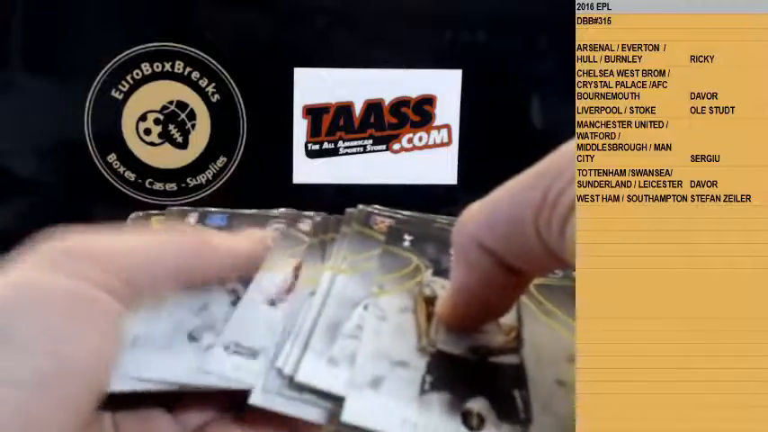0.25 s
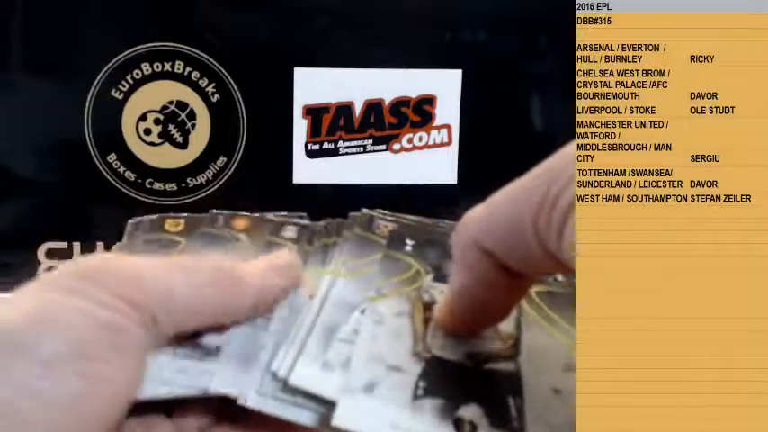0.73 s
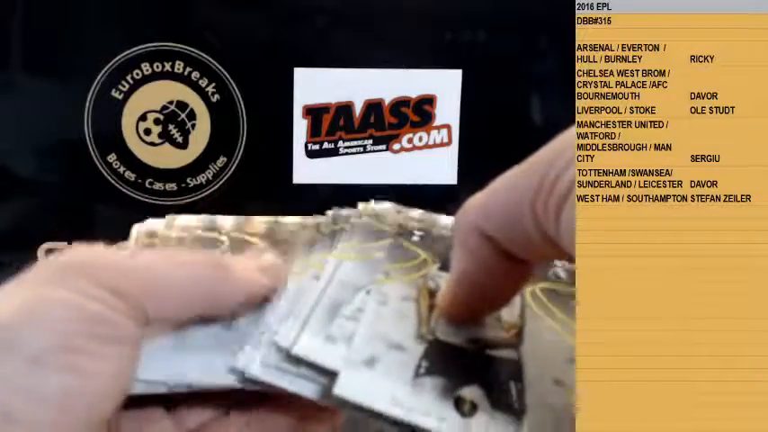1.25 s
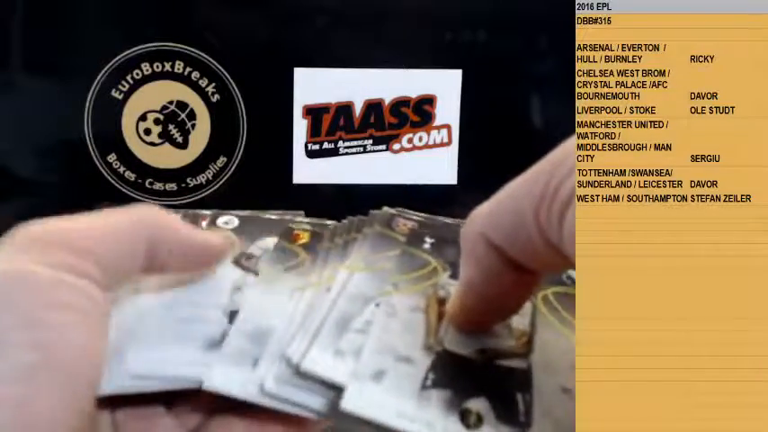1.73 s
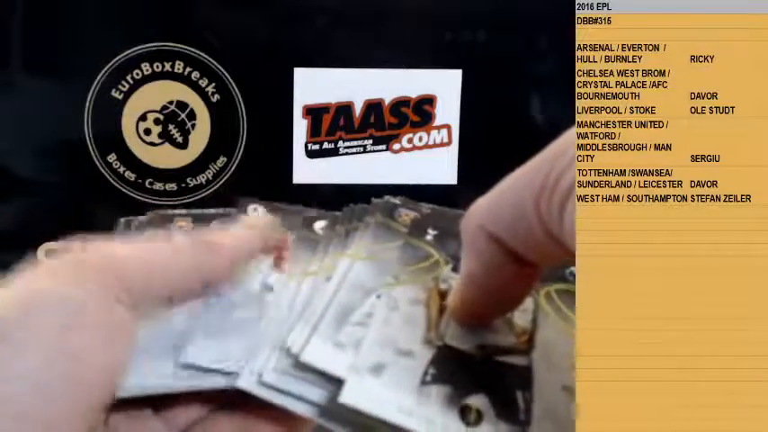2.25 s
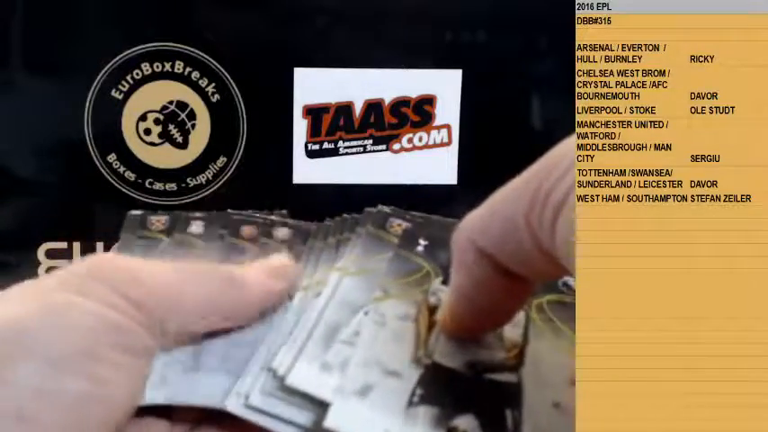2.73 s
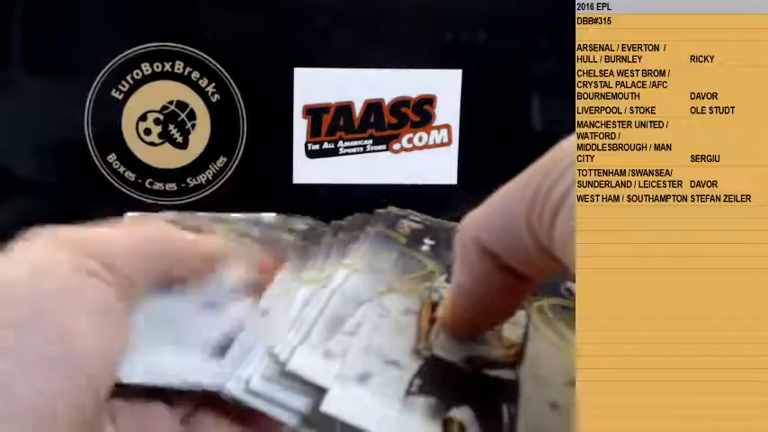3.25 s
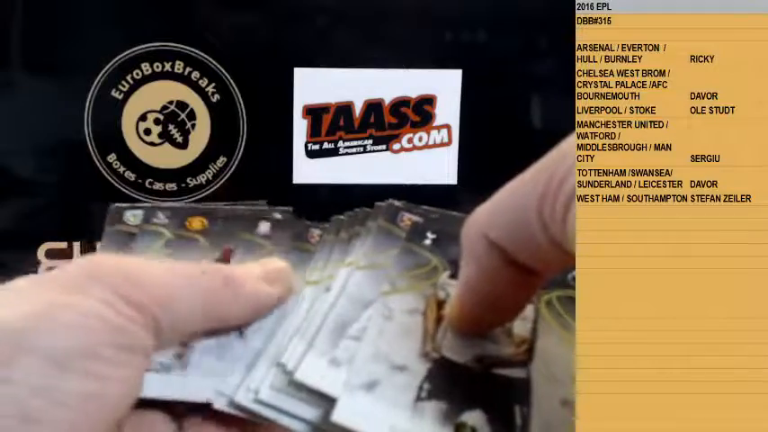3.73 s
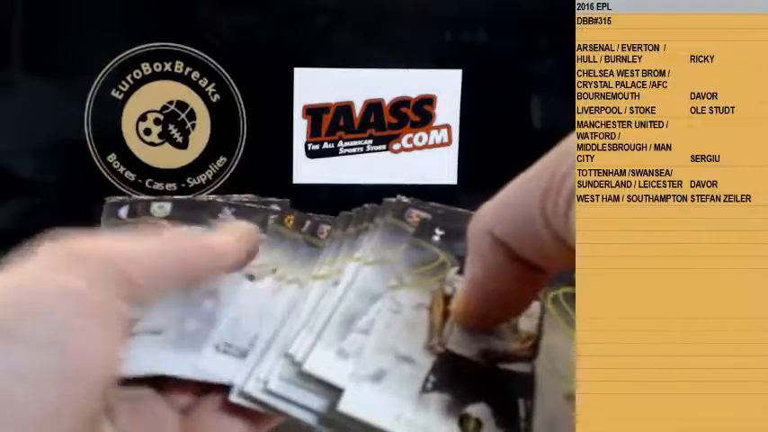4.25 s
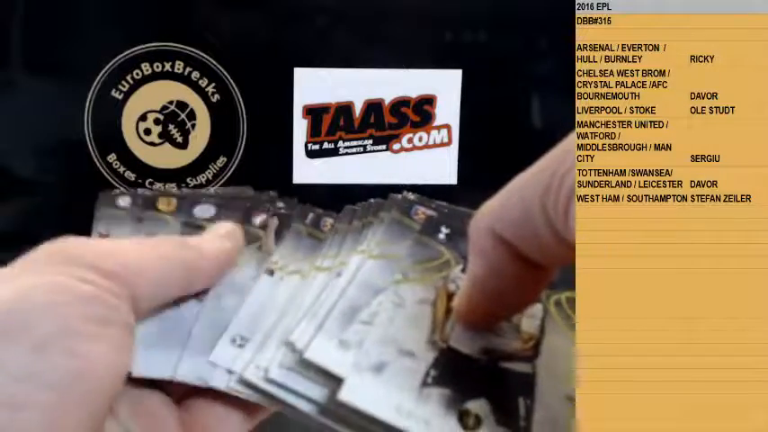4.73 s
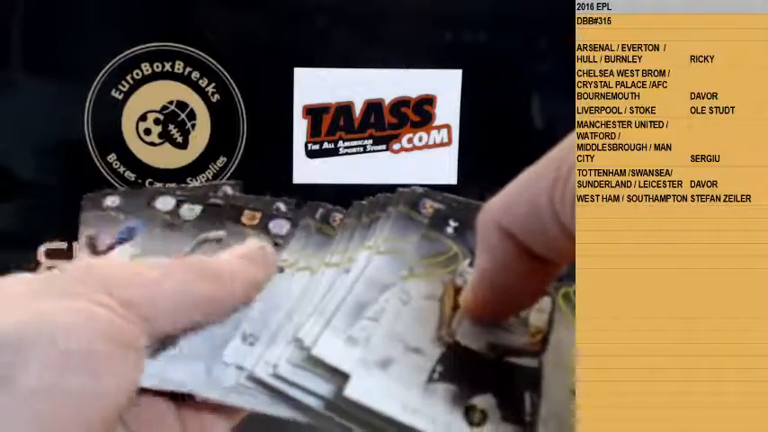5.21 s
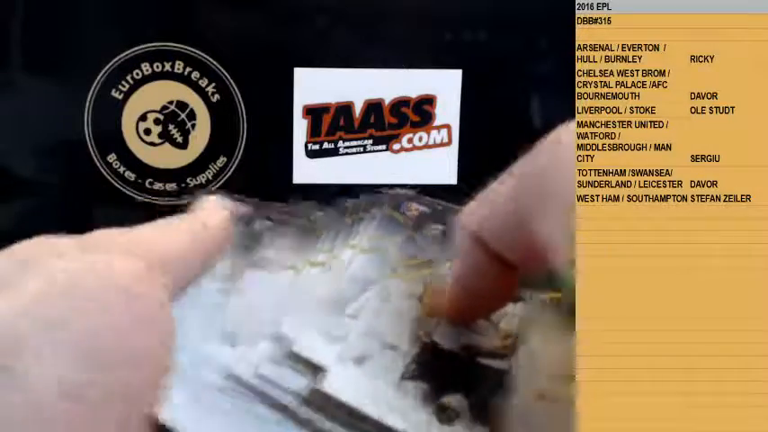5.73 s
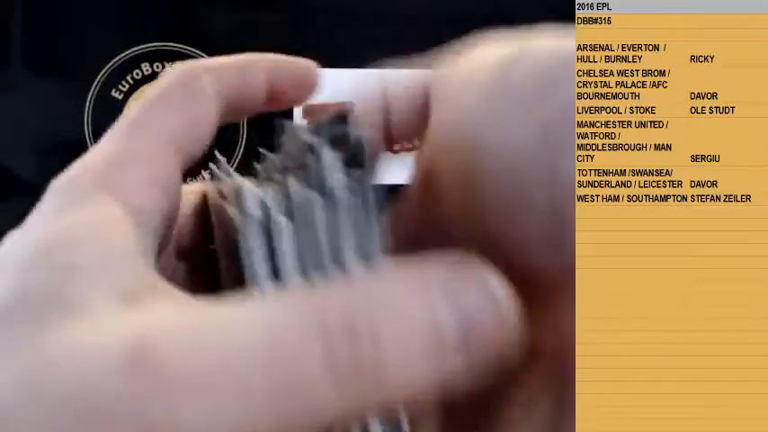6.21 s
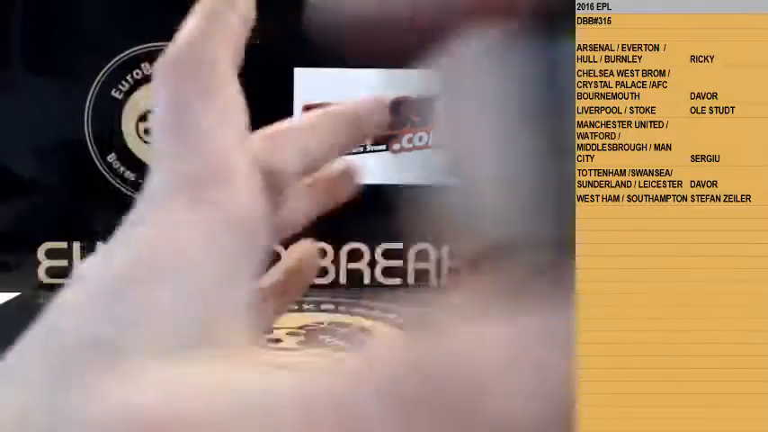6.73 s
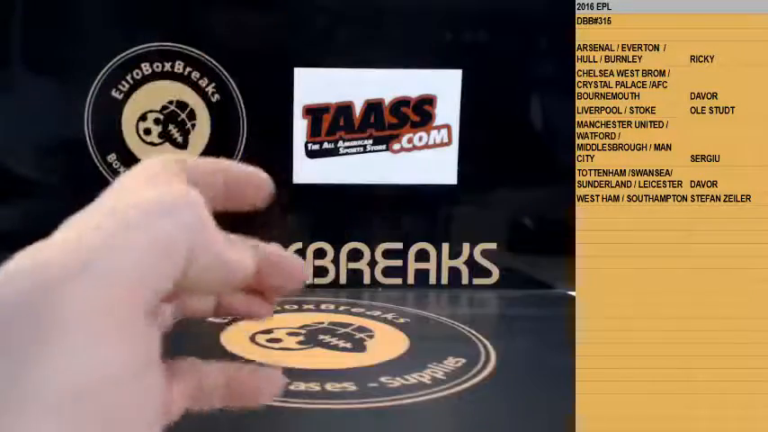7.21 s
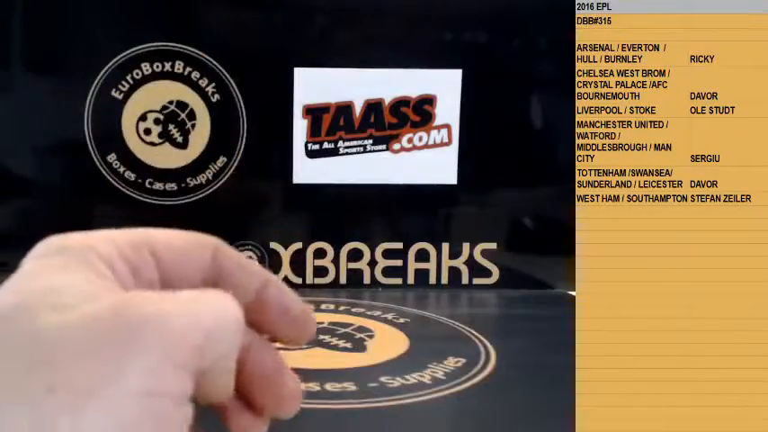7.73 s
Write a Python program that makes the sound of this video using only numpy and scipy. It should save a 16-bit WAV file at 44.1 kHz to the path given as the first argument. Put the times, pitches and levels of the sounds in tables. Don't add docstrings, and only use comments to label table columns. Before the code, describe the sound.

Near stereo microphone, dry small indoor space with faint fan hum and hiss. Thin card edges click and rub irregularly, several times a second, with occasional flat little slaps and dull low bumps from hands. The handling grows busier, a heavy knock of the whole stack stands far above everything, then a muted thud and brisk card scuffs close it.

```python
import sys
import numpy as np
from scipy import signal
from scipy.io import wavfile
from scipy.ndimage import uniform_filter1d

SR = 44100
rng = np.random.default_rng(int(sys.argv[2]) if len(sys.argv) > 2 else 0)


def nominal_scale(level):
    x = np.asarray(level, float) / 20
    return 10 ** x


def to_wav(sig):
    pcm = np.clip(np.atleast_2d(sig), -1, 1) * 32767
    pcm = np.round(pcm).astype(np.int16)
    wavfile.write(sys.argv[1], SR, pcm.T)


N = 351036

# (time [s], blow [dB], contact [s], bass [dB], slap [dB])
STACK_KNOCKS = [
    (7.0906, -2, 0.00034, 6.5, 3),
    (7.0942, -7.5, 0.00027, -8, -30),
    (7.101, -38.5, .0003, -15, 7),
    (7.357, -22, 0.00039, 5, -5),
]


def evened(x):
    return x / np.sqrt(np.mean(x ** 2) + 1e-20)


def wander(size):
    return evened(uniform_filter1d(rng.standard_normal(N), size=size))


def read(points, hz):
    f, value = np.transpose(points)
    return np.interp(np.log(hz + 1), np.log(f + 1), value)


def add(mix, s, sound):
    part = mix[..., max(round(s * SR), 0):][..., :sound.shape[-1]]
    part += sound[..., :part.shape[-1]]


def ring(hz, t60, rise):
    t = np.arange(round(min(t60, 0.5) * SR) + 64) / SR
    x = (1 - np.exp(-t / rise)) * nominal_scale(-60 * t / t60) * np.sin(2 * np.pi * hz * t)
    return x / abs(x).max()


def band(x, lo_hz, hi_hz):
    sos = signal.butter(2, [lo_hz, hi_hz], "bandpass", fs=SR, output="sos")
    return evened(signal.sosfilt(sos, x))


def ports(a, b, colour_db, alike, lead, size):
    # (frequency [Hz], left over right [dB])
    port_tilt = [(60, 9), (120, 6.5), (240, 5.5), (490, 7), (990, 4.5), (1990, 1.5), (4020, -1.1),
                 (8090, 5)]
    hz, t, (za, zb) = signal.stft(np.array([a, b]), SR, nperseg=size, noverlap=size * 3 // 4)
    shared = np.clip(read(alike, hz), 0, 1)[:, None]
    turn = np.exp(2j * np.pi * hz[:, None] * np.interp(t, *np.transpose(lead)))
    side = nominal_scale(read(port_tilt, hz) / 2)[:, None]
    left = za * side
    right = (shared * za * turn + np.sqrt(1 - shared ** 2) * zb) / side
    z = np.array([left, right]) * nominal_scale(colour_db(hz[:, None], t))
    return signal.istft(z, SR, nperseg=size, noverlap=size * 3 // 4)[1][:, :N]


def pressure():
    # (start [s], length [s], first level [dB], last level [dB])
    pushes = [(0.0, 0.12, -47, -81), (0.205, 0.22, -51.5, -74.5), (0.464, 0.14, -66, -50),
              (0.604, 0.091, -60.5, -67), (0.793, 0.11, -58.5, -49.5), (0.898, 0.11, -61.5, -66.5),
              (1.063, 0.14, -60.5, -52.5), (1.217, 0.093, -48.5, -76), (1.357, 0.12, -61, -56),
              (1.492, 0.048, -43, -77), (1.665, 0.16, -56.5, -57), (1.94, 0.14, -54.5, -60),
              (2.09, 0.044, -61, -58.5), (2.243, 0.1, -50.5, -65), (2.33, 0.076, -56.5, -54),
              (2.529, 0.18, -58.5, -63), (2.814, 0.2, -56.5, -63), (3.118, 0.079, -73.5, -48),
              (3.203, 0.14, -46.5, -75), (3.432, 0.087, -87.5, -47.5), (3.522, 0.42, -57.5, -83),
              (3.916, 0.26, -49, -81.5), (4.209, 0.057, -55.5, -67.5), (4.24, 0.13, -53.5, -63.5),
              (4.435, 0.21, -97, -48.5), (4.644, 0.064, -71, -75), (4.819, 0.046, -63.5, -48.5),
              (4.874, 0.13, -69.5, -58.5), (5.283, 0.2, -55.5, -61)]
    # (start [s], length [s], first level [dB], last level [dB])
    handling = [(5.487, 0.2, -69, -55.5), (5.63, .03, -58, -54), (5.65, 0.115, -50.5, -51),
                (5.765, .03, -58.5, -61), (5.793, 0.18, -47, -67), (5.917, 0.11, -63.5, -47.5),
                (6.035, 0.17, -46, -55.5), (6.205, 0.11, -48, -46.5), (6.323, 0.12, -54.5, -45.5),
                (6.436, 0.049, -70, -69), (6.484, 0.11, -51, -55), (6.65, 0.287, -65.5, -58),
                (6.928, 0.17, -65, -53), (7.352, 0.126, -60, -50), (7.479, 0.074, -45, -56),
                (7.533, 0.08, -60, -43), (7.606, 0.086, -62.5, -37), (7.695, 0.083, -61, -51.5),
                (7.784, 0.039, -55, -39), (7.811, 0.082, -49, -71.5), (7.888, 0.07, -61.5, -56)]
    # (start [s], length [s], first level [dB], last level [dB])
    nudges = [
        (0.315, 0.012, -58, -46.5),
        (2.632, 0.021, -49, -66),
        (2.916, 0.038, -50, -59),
        (4.544, 0.045, -56.5, -59.5),
        (5.104, 0.044, -66, -71.5),
        (6.616, 0.054, -73, -75),
        (6.771, 0.016, -41, -69.5),
    ]
    grip_s, let_go_s = 0.006, 0.02
    t = np.arange(N) / SR
    power = np.full(N, nominal_scale(2 * -71.5))
    for start, length, first_db, last_db in [*pushes, *handling, *nudges]:
        at = slice(max(round((start - grip_s) * SR), 0), round((start + length + let_go_s) * SR))
        u = t[at] - start
        held = np.clip(np.minimum(0.5 + u / grip_s, 0.5 + (length - u) / let_go_s), 0, 1)
        power[at] += held ** 2 * nominal_scale(2 * (first_db + (last_db - first_db) * u / length))
    return 10 * np.log10(power)


def slides():
    # (frequency [Hz], density [dB per Hz])
    gloss = [(150, -47), (250, -12.5), (281, 1), (312, 3.5), (472, -16), (572, -10), (703, -6), (757, -4.5),
             (1860, -7.5), (5730, -11.5), (7370, -15.5), (8540, -31.5), (11100, -39), (18800, -120)]
    # (frequency [Hz], likeness [0-1])
    card_alike = [(350, 0.95), (1000, 1), (1700, 0.09), (3100, 0.52), (4500, 0.038), (6500, 0.58),
                  (8000, 0.11)]
    # (time [s], right port earlier by [s])
    card_lead = [(0, -1e-5), (5.4, -3e-5), (5.7, 3e-5), (7.3, 4e-5), (7.45, 2e-4), (7.96, 2e-4)]
    # (time [s], length [s], middle [Hz], width [Hz], lift [dB])
    flexes = [(0.31, 0.1, 2900, 580, 5.5), (2.264, 0.02, 2020, 301, 8.5), (4.2, 0.01, 940, 250, 19),
              (2.915, .015, 980, 310, 12.5), (5.715, 0.094, 1040, 460, 6.5),
              (4.253, 0.016, 6250, 1300, 16.5), (4.344, 0.014, 770, 250, 12.5),
              (5.836, 0.033, 1950, 900, 11.5), (6.356, 0.052, 500, 180, 3.5), (6.587, 0.23, 490, 240, 15.5),
              (7.598, 0.055, 420, 200, 13), (6.044, 0.063, 2700, 500, 5), (6.868, .06, 4600, 1200, 0.5),
              (7.496, 0.02, 3700, 1200, 9.5), (7.526, 0.088, 1500, 760, 12.5), (7.555, .012, 1320, 200, 9),
              (7.445, .02, 1200, 270, 4.5), (.01, 0.033, 880, 210, 10.5), (0.067, .05, 2400, 500, 6.5),
              (2.38, .03, 830, 250, 9), (1.3, 0.045, 2600, 550, 6), (6.72, .08, 1400, 430, 8),
              (7.94, .03, 1200, 580, 10), (5.46, .03, 2600, 900, 6), (6.4, .05, 1700, 400, 5),
              (3.25, .04, 1000, 250, 5), (.86, .05, 950, 250, 4), (5.69, .05, 2000, 700, 4),
              (2.38, .04, 2000, 350, 3.5), (7.81, 0.033, 1450, 280, 17.5), (7.821, 0.074, 2920, 610, 7.5)]
    db = pressure()
    body_db = -4 - 0.4239 * (db + 59.0)
    stick_slip_db = 2.0 * wander(90) + 2.17 * wander(700)
    catches = rng.standard_normal((2, N)) * nominal_scale(2.2 * np.minimum(rng.exponential(1, (2, N)), 5))
    catches *= nominal_scale(stick_slip_db)
    catches += nominal_scale(11) * (rng.random(N) < 400 / SR) * rng.standard_normal(N)

    def colour(hz, t):
        patches = uniform_filter1d(rng.standard_normal((len(t), len(hz))), 16, 0)
        patches = evened(uniform_filter1d(patches, 5, 1)).T
        body = np.interp(t, np.arange(N) / SR, body_db) / (1 + (hz / 1800) ** 4)
        flex = sum(lift_db * np.exp(-((t - at) / long) ** 2 - ((hz - mid_hz) / wide) ** 2)
                   for at, long, mid_hz, wide, lift_db in flexes)
        return read(gloss, hz) + body + flex + 1.7 * patches

    pair = ports(*catches, colour, card_alike, card_lead, size=256)
    return nominal_scale(db + 2.5) * evened(pair)


def ticks():
    # (time [s], peak [dB], ring [Hz], stack thud [dB])
    releases = [(0.1825, -41.5, 2380, -41), (0.4691, -38.5, 2400, -38), (0.796, -34.5, 2460, -47),
                (1.067, -39, 2600, -35), (1.213, -45.5, 3450, -7), (1.3603, -50, 2550, -11),
                (1.4953, -46.5, 6060, -12), (1.6678, -56, 3070, -17), (1.937, -37, 2970, -22),
                (2.2253, -45, 3170, -16), (2.5319, -36, 3650, -21), (3.002, -47, 6160, -22),
                (4.96, -49, 3230, -22), (5.5048, -48.5, 3000, -25), (5.797, -38, 1840, -16),
                (5.798, -46, 2120, -22), (5.8979, -40.5, 2460, -30), (6.7188, -51, 3000, 0),
                (6.7706, -36, 4000, -10.5), (7.358, -41.5, 2500, -27), (2.106, -53, 4500, -25),
                (3.417, -62, 2700, -25), (1.9498, -39, 3050, -25)]
    # (time [s], peak [dB], ring [Hz], stack thud [dB])
    caught = [(0.1478, -55, 2320, -19), (0.229, -33.5, 3500, -16), (0.5068, -48, 3150, 0),
              (0.5872, -43.5, 3300, -11), (0.834, -40, 2560, -14), (0.868, -42.5, 3300, -7.5),
              (1.099, -45.5, 2240, -6), (1.1338, -47.5, 2560, -9), (1.2298, -35, 3220, -20),
              (1.9468, -36.5, 3500, -11), (1.9625, -37.5, 3000, -11), (2.243, -43, 3400, -6),
              (2.5463, -40.5, 3330, -4), (2.87, -54, 2900, 7), (3.1188, -43.5, 3700, -14.5),
              (3.2418, -43, 3250, -9), (3.542, -45.5, 3420, -7), (4.538, -60, 1450, 3),
              (4.8231, -47.5, 3420, -5), (4.2068, -51, 3300, -7), (4.5065, -48.5, 2790, 0.5),
              (4.545, -60, 3500, -19), (4.8435, -43.5, 1620, -6), (5.239, -48.5, 3540, -5),
              (2.815, -40.5, 3530, -17), (3.0893, -46.5, 6040, -19), (3.467, -43.5, 2360, -11.5),
              (5.682, -38.5, 2380, -12), (5.811, -42.5, 1500, -4), (5.83, -41, 2100, -19),
              (6.088, -40.5, 2020, -9.5), (5.994, -48, 3140, -6), (6.136, -39.5, 3550, -14),
              (6.218, -39.5, 1910, -21), (6.3575, -45, 1500, -13), (5.535, -47.5, 2800, -13),
              (6.4255, -37, 3940, -12), (6.4362, -37.5, 3270, -8.5), (6.496, -40, 1730, -22)]
    # (time [s], peak [dB], middle [Hz],
    # stack thud [dB])
    brushes = [(0.047, -48, 2300, -13), (0.056, -47, 3600, -20), (0.1533, -50, 2780, -25),
               (0.2056, -44, 4200, -25), (0.3935, -44.5, 4000, -21), (0.4175, -52, 3800, -22),
               (0.635, -46, 3500, -25), (0.674, -49, 4500, -20), (2.7712, -50.5, 4500, -20),
               (4.1765, -57, 4000, -20), (4.186, -57, 5200, -25), (4.415, -61, 2600, -20),
               (4.919, -44, 4050, -13), (5.118, -55, 3000, -12), (5.133, -53, 3000, -15),
               (5.2884, -39.5, 3600, -13), (6.4975, -39.5, 3700, -25), (6.503, -43, 4800, -20),
               (7.091, -32.5, 3300, -31), (5.797, -43, 4800, -25), (5.8985, -45, 7000, -30)]
    # (time [s], peak [dB], sharpness [Hz])
    snaps = [
        (4.2068, -34.5, 1600),
        (4.5062, -36.5, 1400),
        (4.8235, -40, 860),
        (5.2388, -35, 1800),
        (6.7197, -33, 1250),
        (2.243, -34, 2900),
        (.5065, -44, 930),
    ]
    out = np.zeros((2, N))
    edges = [(*row, 0.008, -2) for row in releases]
    edges += [(*row, 0.005, 3) for row in caught]
    edges += [(*row, 0.002, 0) for row in brushes]
    for at, db, hz in snaps:
        add(out, at, -np.outer(nominal_scale([db + 1.0, db - 2.5]), ring(hz, 1.8 / hz, 0.00003)))
    chance = rng.random((len(edges), 3))
    cracks = rng.standard_normal((len(edges), 200))
    crack_t = np.arange(200) / SR
    for (at, db, hz, thud_db, t60, crack_db), (u, v, w), crack in zip(edges, chance, cracks):
        x = np.zeros(2000)
        add(x, 0, ring(hz, t60, 0.0002))
        add(x, 0.0001, nominal_scale(-7) * ring(hz * (1.9 + 0.3 * u), 0.6 * t60, 0.0001))
        add(x, 0.0002, nominal_scale(-8) * ring(hz * (1.25 + 0.2 * v), 0.6 * t60, 0.0001))
        add(x, 0.003, nominal_scale(-19) * ring(0.93 * hz, 3.6 * t60, 0.0016))
        add(x, 0, nominal_scale(crack_db - 60 * crack_t / 0.0034) * uniform_filter1d(crack, size=3))
        add(x, 0, -nominal_scale(thud_db + 3.5) * ring(650 + 350 * v, 0.014, 0.0011))
        add(x, 0, -nominal_scale(thud_db + 7) * ring(900, 0.0018, 0.00005))
        add(out[0], at + 0.00019, nominal_scale(db + 1.6) * x)
        add(out[1], at + 0.00021 + 6e-5 * w, nominal_scale(db - 2.0) * x)
    return out


def sparks():
    # (time [s], peak [dB])
    needles = [(-.0014, -62), (0.204, -67.5), (.2275, -87), (0.3925, -84), (.4162, -90), (0.634, -81),
               (1.0657, -83), (1.3583, -92), (1.948, -80), (2.5442, -91), (5.238, -91), (1.2136, -83),
               (1.6623, -78), (1.9365, -68), (2.7696, -85), (3.0011, -84), (3.0884, -84), (4.2054, -72),
               (6.4358, -78), (6.7692, -62)]
    x = np.zeros(N)
    for at, db in needles:
        add(x, at + 0.0015, nominal_scale(db + 15) * ring(7900, 0.0015, 0.00002))
    flicker = nominal_scale(3.0 * wander(1500) + 0.06 * (pressure() + 58))
    x += nominal_scale(-108) * flicker * band(rng.standard_normal(N), 8300, 15500)
    return np.outer(nominal_scale([1.5, -1.5]), x)


def modes(rows, t):
    return sum(250 / hz * nominal_scale(db - 60 * t / t60) * np.cos(2 * np.pi * hz * t) for hz, db, t60 in rows)


def knocks():
    # (frequency [Hz], level [dB], t60 [s])
    table_modes = [(96, -4, 0.23), (109.3, -0.5, 0.15), (141.4, -6.5, 0.3), (164.6, -6, 0.33),
                   (220, -4.5, 0.22), (260, -9.5, 0.26), (283, -12, 0.19), (324, -11.5, 0.3),
                   (435, -2, 0.08), (470, -20, 0.22), (580, -19, 0.25), (895, -41, 0.22), (1254, -50, 0.25),
                   (1330, -49, 0.25)]
    # (frequency [Hz], level [dB], t60 [s])
    stack_modes = [(251, 2, 0.043), (578, -7.5, 0.032), (716, -14.5, .035), (797, -26, .035),
                   (1270, -16, 0.031), (1730, -14, .03), (2200, -47, 0.032), (2460, -26, .02),
                   (2930, -32, 0.0197)]
    right_early_s, bounce_early_s, slap_late_s = 0.00051, 0.00018, 0.00104
    t = np.arange(SR // 2) / SR
    table, face = modes(table_modes, t), modes(stack_modes[:1], t)
    out, slap = np.zeros((2, N)), np.zeros(4000)
    for k, (hz, db, t60) in enumerate(stack_modes[1:]):
        damped_s = min(t60, 20 / hz + 0.005)
        add(slap, 0, (-1) ** k * nominal_scale(db) * ring(hz, damped_s, 0.0006))
    rattle = nominal_scale(-19.5 - 60 * t[:4000] / 0.028) * (1 - np.exp(-t[:4000] / 0.0004))
    slap += rattle * band(rng.standard_normal(4000), 490, 1300)
    for k, (at, db, contact, bass_db, slap_db) in enumerate(STACK_KNOCKS):
        u = (t[:600] - t[300]) / contact
        pull, quick = np.where(u < 0, 0.4, 1), np.where(u < 0, 1, 1.6)
        blow = pull * u * np.exp(-np.sqrt(0.21 + u ** 2) * quick) / (contact * SR) ** 2 * 14
        blow -= blow.mean() * signal.windows.hann(600) * 2
        left = signal.oaconvolve(face + nominal_scale(bass_db - 10.5) * table, blow)
        right = signal.oaconvolve(0.62 * face + nominal_scale(bass_db - 14.5) * table, blow)
        early_s = right_early_s if k == 0 else bounce_early_s
        add(out[0], at - t[300], nominal_scale(db) * left)
        add(out[1], at - t[300] - early_s, nominal_scale(db) * right)
        add(out[0], at + slap_late_s, nominal_scale(db + slap_db - 1.0) * slap)
        add(out[1], at + slap_late_s - 0.52 * right_early_s, nominal_scale(db + slap_db - 9.5) * slap)
    return out


def shudder():
    # (time [s], level [dB])
    hands = [(0.0, -58.5), (1.6, -60.5), (1.75, -64.5), (2.37, -58.5), (3.12, -61), (3.7, -61),
             (4.21, -59.5), (5.05, -64.5), (5.67, -61.5), (5.85, -58), (6.41, -55), (6.58, -55), (6.8, -84),
             (7.05, -53), (7.21, -65), (7.4, -41.5), (7.58, -71), (7.96, -58)]
    # (time [s], peak [dB], ring [Hz], t60 [s])
    bumps = [(0.197, -36.5, 61, 0.055), (0.829, -38, 42.5, 0.073), (1.661, -41, 57, 0.11),
             (1.933, -46.5, 36.3, 0.3), (2.55, -40, 37.5, 0.2), (3.47, -43, 54.3, 0.45),
             (4.821, -34, 92, 0.042), (4.887, -40, 55, .1), (1.07, -39.5, 70, 0.071), (5.6, -43, 45, 0.091),
             (0.49, -40, 45, 0.072), (3.2, -43, 49.7, 0.11), (5.37, -44, 40, 0.13),
             (6.994, -42, 48.3, 0.12), (7.355, -20, 97.5, 0.11)]
    # (time [s], peak [dB], ring [Hz], t60 [s])
    finger_taps = [(0.134, -41, 253, 0.063), (0.035, -44, 300, .04), (4.823, -44, 330, .02),
                   (7.552, -43, 450, 0.036), (0.559, -35, 476, 0.042), (6.4205, -40.5, 260, 0.14),
                   (6.721, -37, 280, 0.025), (6.771, -31.5, 290, 0.02), (7, -34, 315, 0.02),
                   (7.43, -24.5, 290, 0.032), (7.44, -32.5, 420, 0.056), (7.517, -39, 574, 0.04),
                   (1.26, -46, 233, .08)]
    # (time [s], peak [dB], ring [Hz], t60 [s])
    lifts = [
        (4.214, -38, 64.4, 0.077),
        (4.509, -38, 59, 0.13),
        (5.241, -39, 58, 0.049),
        (6.011, -38.5, 40.7, 0.24),
        (6.375, -41, 45, .1),
        (6.49, -38, 41.8, .1),
    ]
    s, hands_db = np.transpose(hands)
    x = nominal_scale(np.interp(np.arange(N) / SR, s, hands_db) + 3.0) * band(rng.standard_normal(N), 28, 62.0)
    for at, db, hz, t60 in [*bumps, *finger_taps]:
        add(x, at, -nominal_scale(db - 2.5) * ring(hz, t60, 0.15 / hz))
        add(x, at, nominal_scale(db - 13.5) * ring(1.66 * hz, 0.27 * t60, 0.1 / hz))
    for at, db, hz, t60 in lifts:
        add(x, at, nominal_scale(db) * ring(hz, t60, 0.059 / hz))
    return x * nominal_scale([[3], [-3.5]])


def room(x):
    # (frequency [Hz], t60 [s])
    room_decay = [(100, 0.41), (500, 0.28), (1000, 0.31), (2000, 0.23), (8000, 0.098)]
    echoes = np.zeros((2, SR // 2))
    at = np.arange(200, SR // 2 - 20, 20)
    at = at + rng.integers(0, 20, (2, (SR // 2 - 201) // 20))
    np.put_along_axis(echoes, at, rng.choice([-1., 1.], at.shape), 1)
    hz, t, z = signal.stft(echoes, SR, nperseg=256)
    tail = signal.istft(z * nominal_scale(-60 * t / read(room_decay, hz)[:, None]), SR, nperseg=256)[1]
    return signal.fftconvolve(x, tail / np.linalg.norm(tail[0]), axes=1)[:, :N]


def air():
    # (frequency [Hz], density [dB per Hz])
    air_tone = [(12, -22.5), (20, 5.5), (51, -19), (81, -6.5), (141, -4.5), (301, -8.5), (452, -16),
                (731, -14), (789, -18), (1120, -21.5), (1240, -28.5), (1490, -27.5), (3430, -44.5),
                (7720, -41), (8540, -34), (11100, -47), (18800, -120)]
    # (frequency [Hz], likeness [0-1])
    air_alike = [(60, 0.71), (350, 1), (1000, 0.74), (2000, 0.2), (8000, 0.037)]
    # (frequency [Hz], width [Hz], level [dB])
    fan_tones = [(96.6, 17, -67.5), (121.4, 10.1, -62), (160.8, 8.4, -65.5), (250, 27, -68.5),
                 (286, 19, -64), (719, 6, -71.5)]
    t = np.arange(N) / SR
    hiss = rng.standard_normal((2, N))
    lead = [(0, 0.00028), (8, 0.00034)]  # (time [s], right port earlier by [s])
    pair = ports(*hiss, lambda hz, t: read(air_tone, hz) + 0 * t, air_alike, lead, size=2048)
    fan = sum(nominal_scale(db) * band(rng.standard_normal(N), hz - w / 2, hz + w / 2) for hz, w, db in fan_tones[:-1])
    fan *= nominal_scale(2.5 * wander(6000))
    hz, w, db = fan_tones[-1]
    fan += nominal_scale(db) * np.sin(2 * np.pi * hz * t + w * wander(8000) / 8)
    whine = np.outer(nominal_scale([-75, -88]) * [1, -1], np.sin(2 * np.pi * 8000 * t))
    return nominal_scale(-58.5) * pair / np.std(pair.mean(0)) + fan * nominal_scale([[2.5], [-3]]) + whine


def scene():
    cards, blows = slides() + ticks(), knocks()
    puffs = np.zeros((2, N))
    puff = band(np.arange(400) == 0, 420, 1400)[None]
    for at, db, *_ in STACK_KNOCKS:
        add(puffs, at, nominal_scale(db - 36.5) * puff)
    boom_band = signal.butter(1, [150, 700], "bandpass", fs=SR, output="sos")
    echo = room(signal.sosfilt(boom_band, blows))
    boom = nominal_scale(-16) * (echo + 0.5 * echo[::-1]) / 1.32
    return cards + blows + room(nominal_scale(-13.5) * cards + puffs) + boom + shudder() + air()


def band_limit(x):
    return signal.sosfilt(signal.butter(12, 15800, fs=SR, output="sos"), x)


def record(dry):
    held = dry / (1 + (dry / 1.06) ** 6) ** (1 / 6)
    edge = signal.firwin(201, 8400, window=("kaiser", 9), fs=SR)
    mix = signal.oaconvolve(held, edge[None], "same") + sparks()
    return band_limit(mix)


dry = scene()
out = record(dry)
to_wav(out)
```